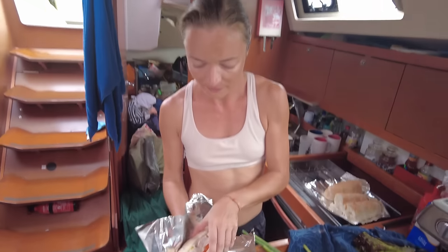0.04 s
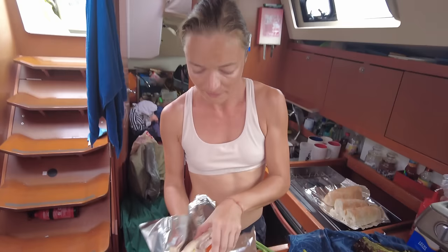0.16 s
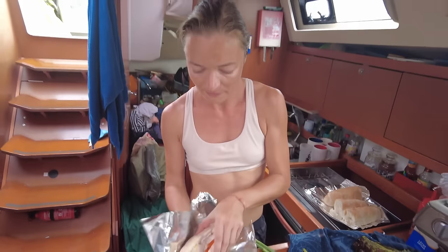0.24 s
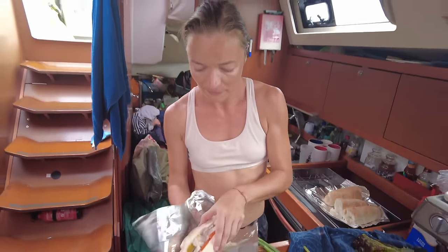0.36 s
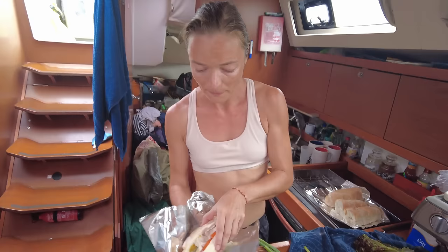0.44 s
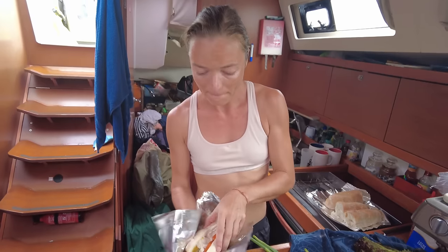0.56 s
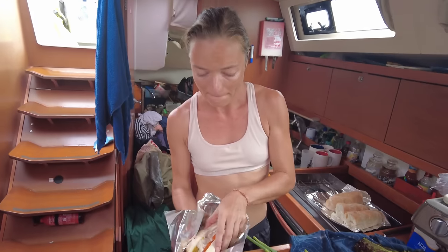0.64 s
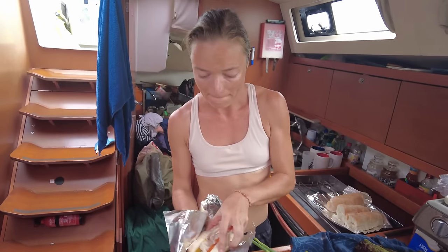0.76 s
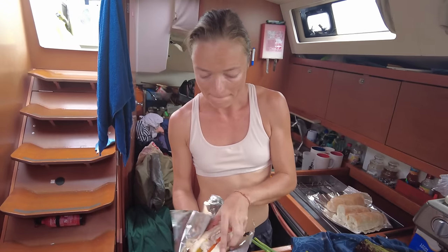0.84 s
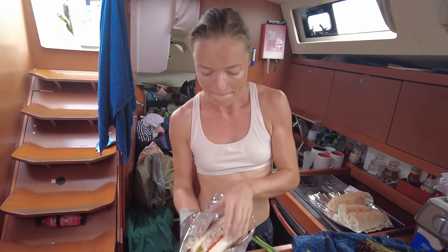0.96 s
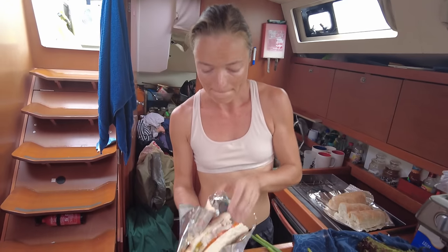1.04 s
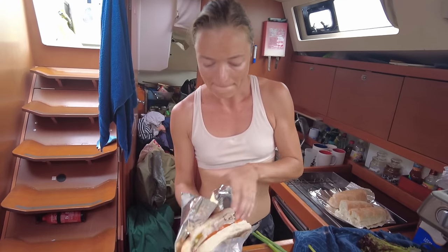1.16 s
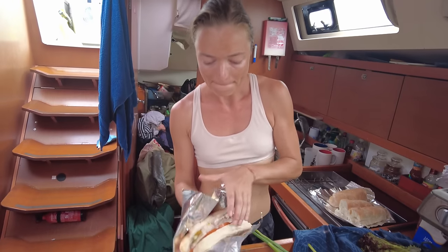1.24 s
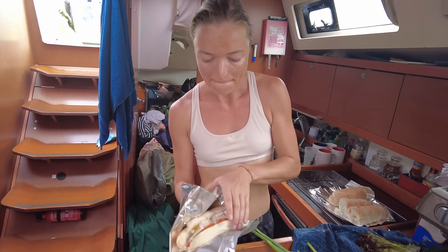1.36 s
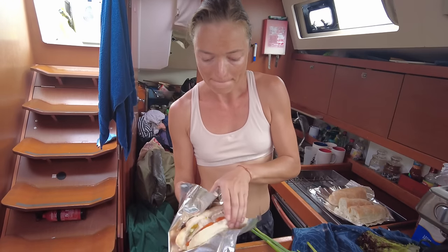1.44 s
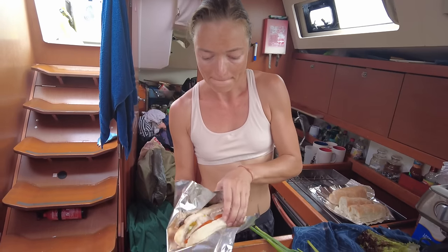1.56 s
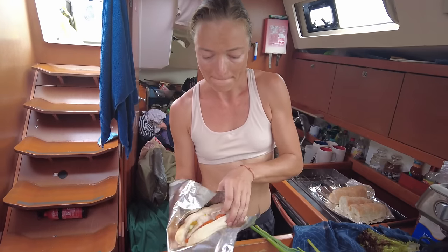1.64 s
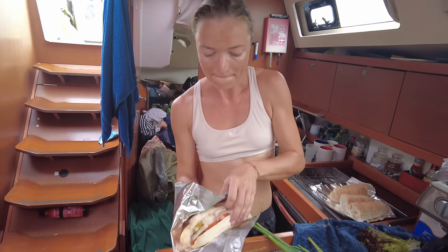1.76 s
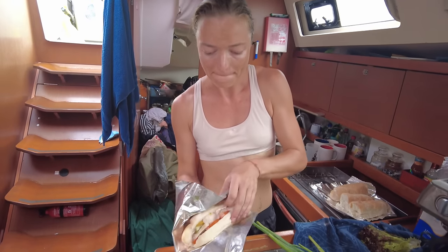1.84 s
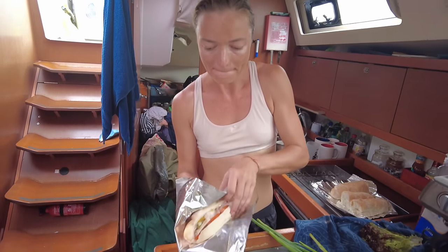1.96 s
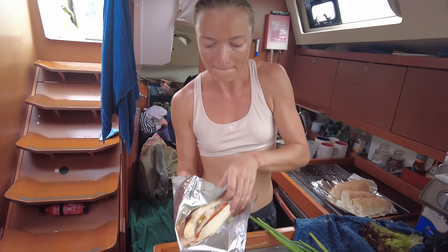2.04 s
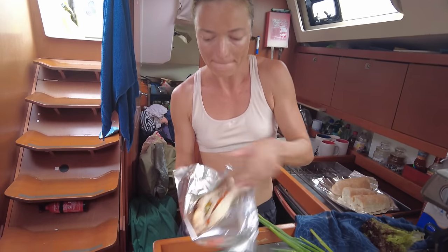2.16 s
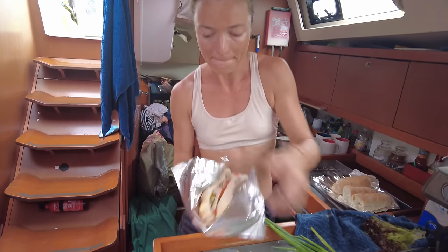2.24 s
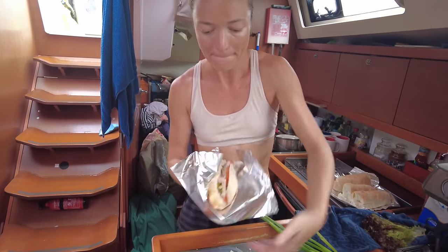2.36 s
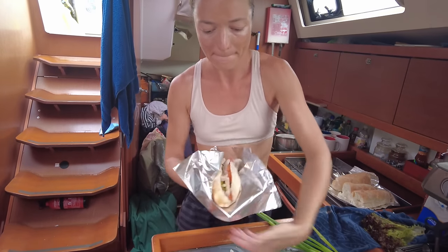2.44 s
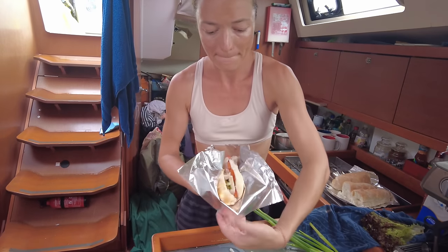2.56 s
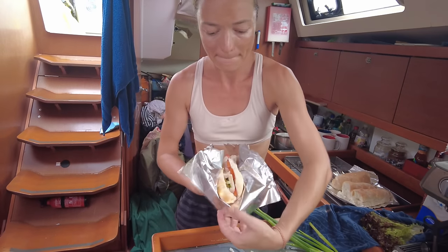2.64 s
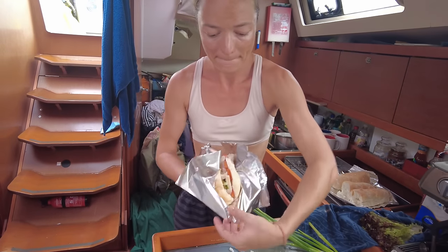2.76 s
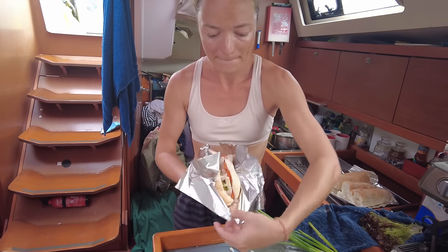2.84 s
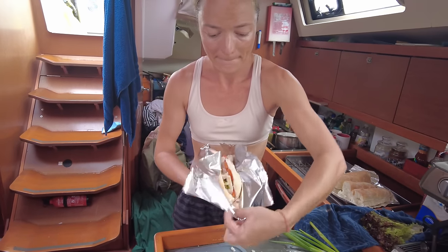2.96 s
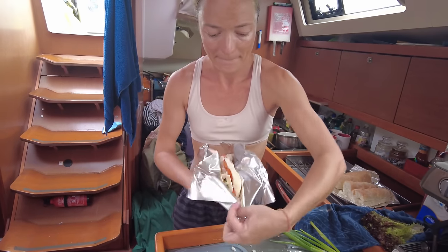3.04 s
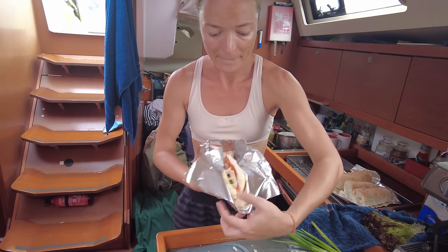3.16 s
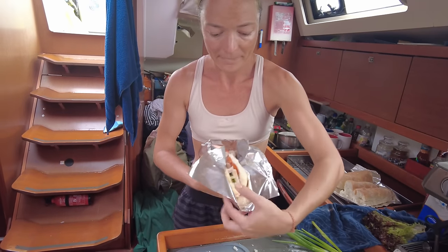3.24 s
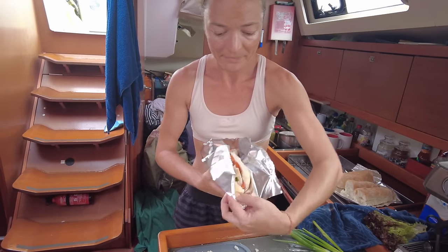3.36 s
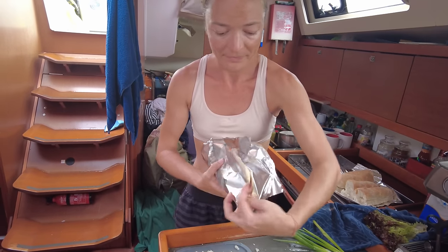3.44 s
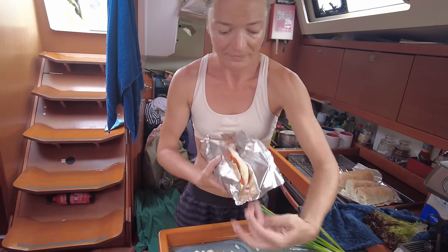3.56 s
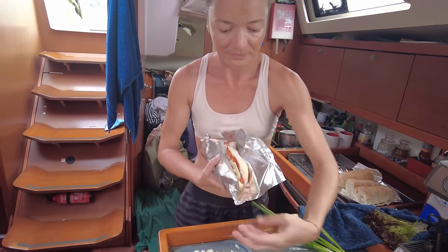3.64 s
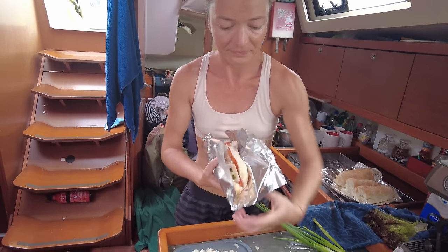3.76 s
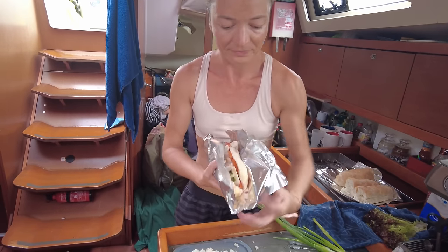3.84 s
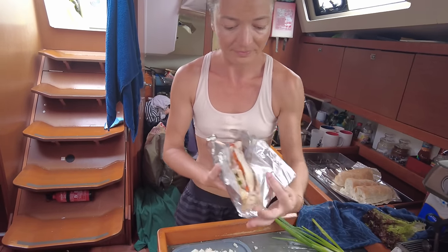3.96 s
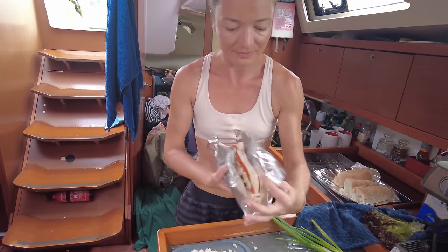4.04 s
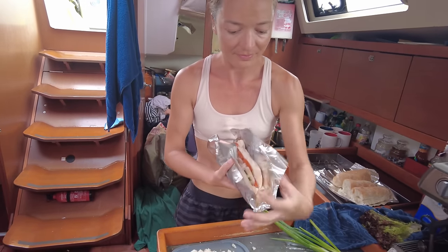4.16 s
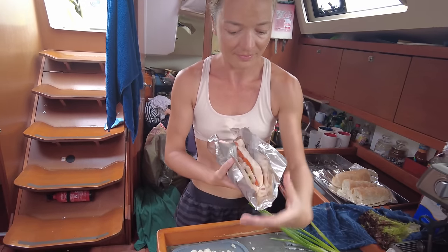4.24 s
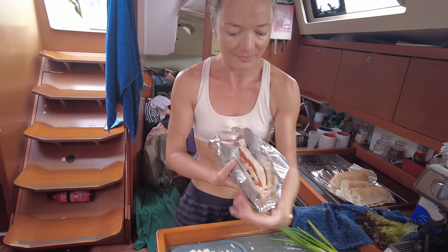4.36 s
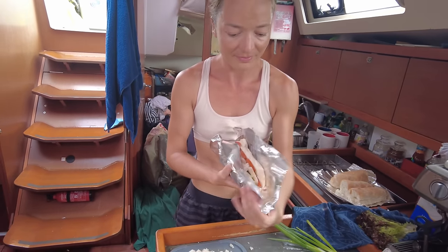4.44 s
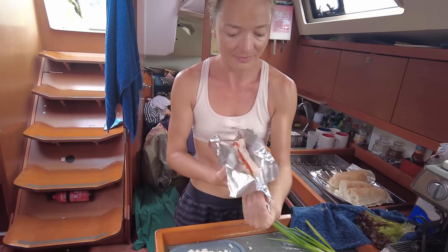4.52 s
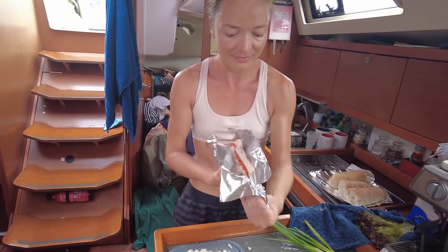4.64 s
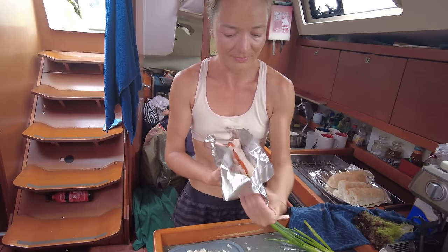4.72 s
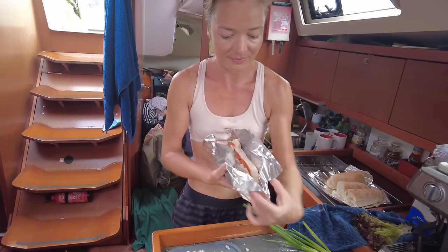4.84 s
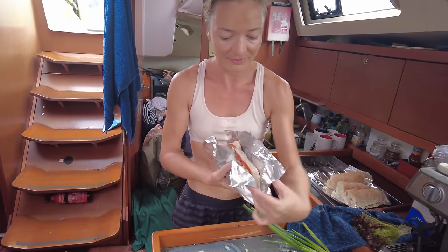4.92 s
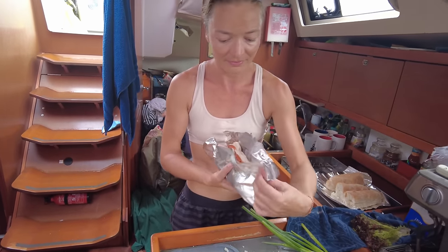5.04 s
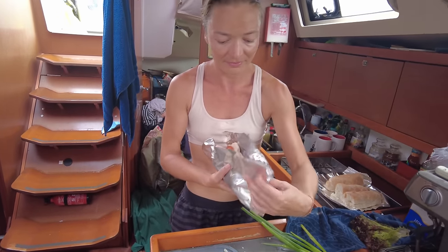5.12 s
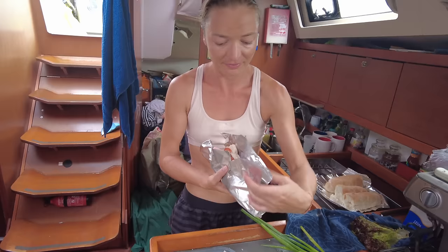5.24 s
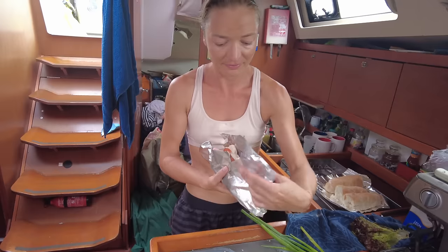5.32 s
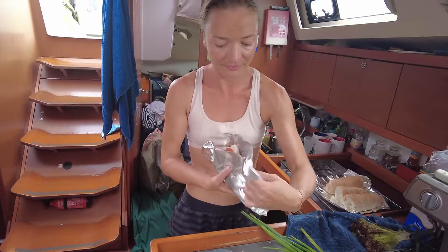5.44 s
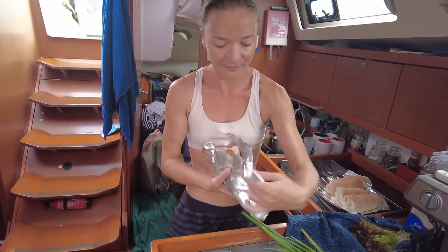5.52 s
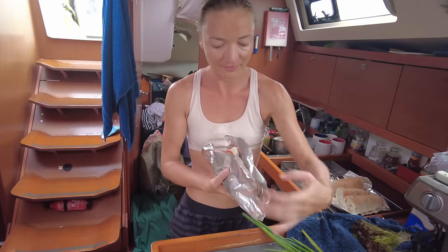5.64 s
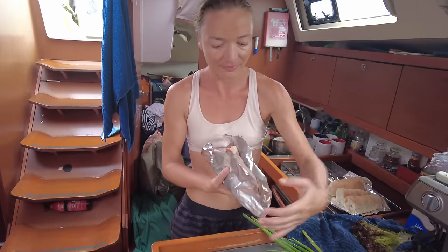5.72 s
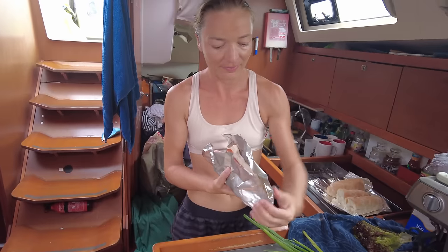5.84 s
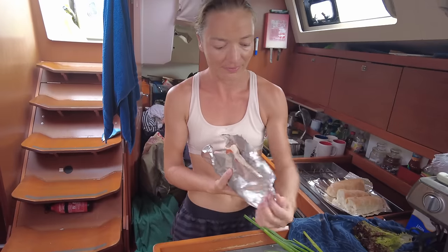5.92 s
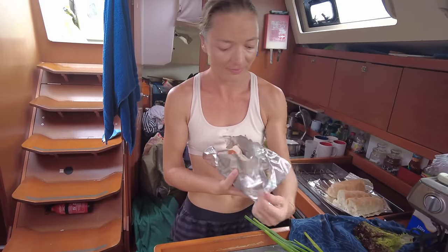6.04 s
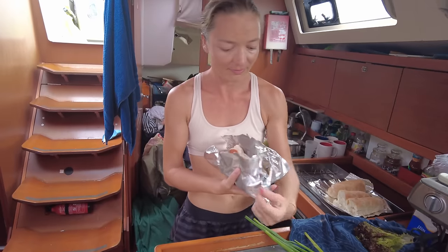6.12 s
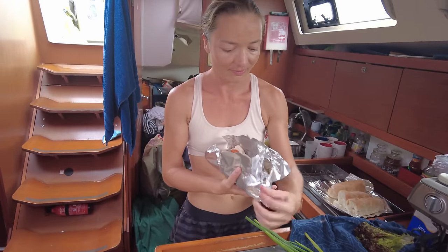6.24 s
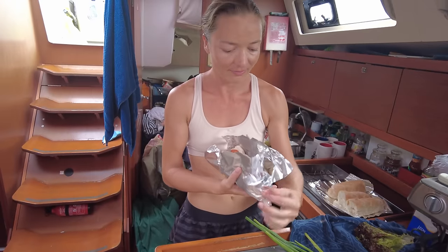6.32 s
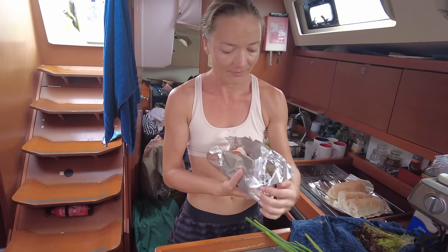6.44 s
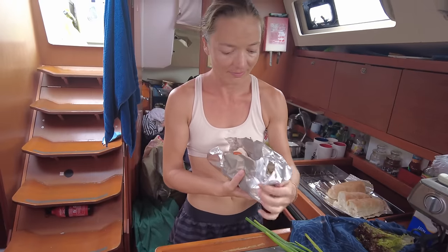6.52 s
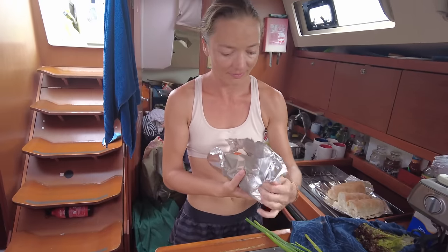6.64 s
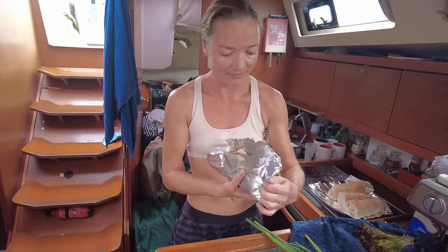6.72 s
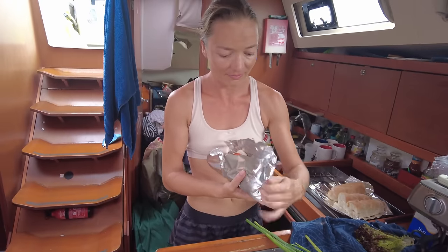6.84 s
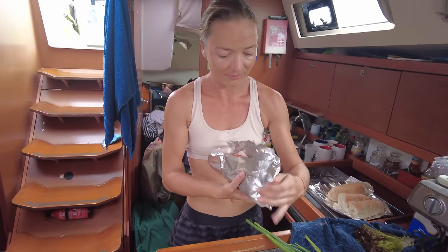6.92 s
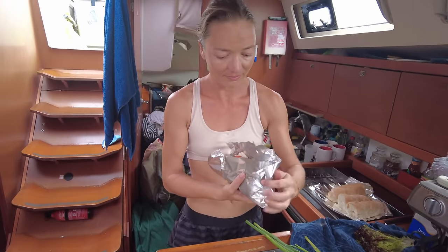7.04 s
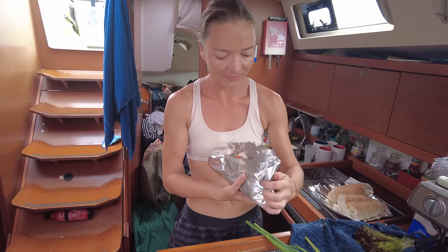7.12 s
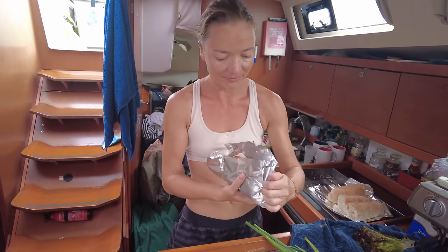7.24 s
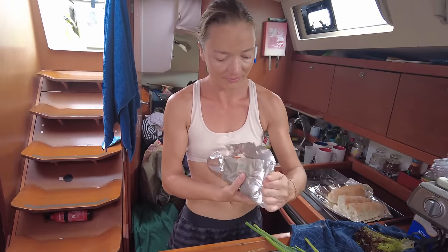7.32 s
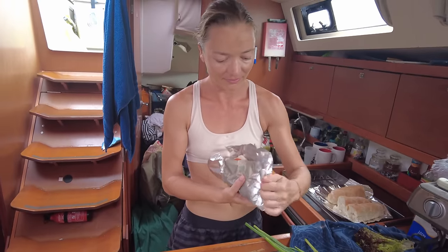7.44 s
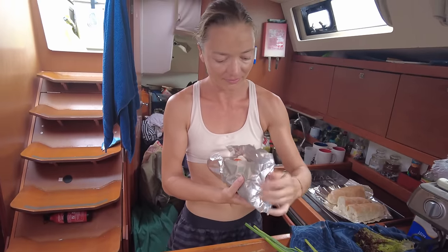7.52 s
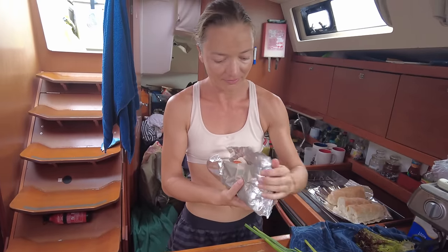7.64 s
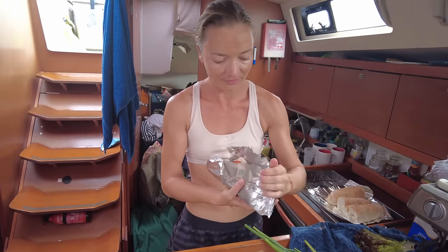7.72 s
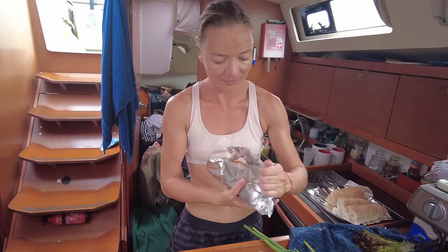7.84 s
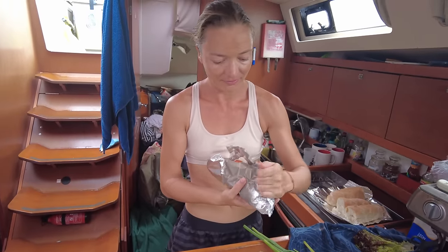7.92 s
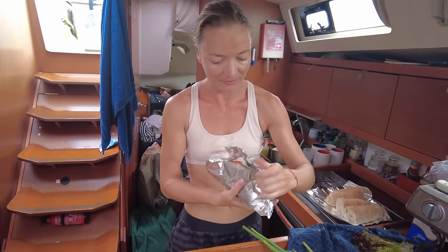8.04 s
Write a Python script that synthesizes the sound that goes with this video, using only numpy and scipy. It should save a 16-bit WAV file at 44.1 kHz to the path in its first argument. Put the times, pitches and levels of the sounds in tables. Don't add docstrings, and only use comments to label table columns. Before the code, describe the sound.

Crisp aluminium foil crackles and snaps close up as hands fold and press it around food, over a faint far engine drone.

```python
import sys
import numpy as np
from scipy import signal
from scipy.fft import rfft, irfft
from scipy.io import wavfile

SR = 44100
rng = np.random.default_rng(int(sys.argv[2]) if len(sys.argv) > 2 else 0)


def volts_from_decibels(level):
    exponent = np.asarray(level, float) / 20
    return 10 ** exponent


def to_wav(sig):
    pcm = np.clip(np.atleast_2d(sig), -1, 1) * 32767
    pcm = np.round(pcm).astype(np.int16)
    wavfile.write(sys.argv[1], SR, pcm.T)


N = 356416
EVENT_N = 4000

EDGES = 130 * 2 ** np.arange(0, 7.4, 1 / 3)


def rms_one(x):
    return x / np.sqrt(np.mean(x ** 2) + 1e-20)


def in_time(rows):
    s, *columns = np.transpose(rows)
    return [np.interp(np.arange(N) / SR, s, c) for c in columns]


def at_hz(points, hz):
    points_hz, values = np.array(points)[:, 0], np.array(points)[:, 1]
    return np.interp(np.log(hz), np.log(points_hz), values)


def drift(rate_hz):
    r = np.exp(-40 * np.pi * rate_hz / SR)
    white = rng.standard_normal(N // 20 + 2002)
    slow = signal.lfilter([1], [1, -2 * r, r * r], white)[2000:]
    return np.interp(np.arange(N) / 20, np.arange(len(slow)), rms_one(slow))


def band(x, low_hz, high_hz):
    sos = signal.butter(2, [low_hz, min(high_hz, .45 * SR)], "band", fs=SR, output="sos")
    return signal.sosfilt(sos, x)


def resonance(x, hz, width_hz):
    r = np.exp(-np.pi * width_hz / SR)
    zeros = np.array([1, 0, -1]) * (1 - r * r) / 2
    return signal.lfilter(zeros, [1, -2 * r * np.cos(2 * np.pi * hz / SR), r * r], x)


def add_event(out, start, sound):
    out[start:start + EVENT_N] += sound


def buckles(per_s, spread_db, clump_db):
    sizes = volts_from_decibels(spread_db * np.minimum(rng.exponential(1, N), 5)) * rng.choice([-1, 1], N)
    chance = per_s * volts_from_decibels(clump_db * drift(25.0)) / SR
    return sizes * (rng.random(N) < chance)


def pressure():
    # start_s, rise_s, fall_s, peak_db, boom_db (broad sheet)
    grips = [(0.0, 0.0035, 0.06, -35, -5.5), (0.10, 0.12, 0.083, -31.5, -10),
             (0.308, 0.021, 0.17, -34, -11.5), (0.4, 0.042, 0.095, -26.5, -12.5),
             (0.52, 0.018, .04, -29, -10), (0.545, 0.046, 0.26, -29, -8.5), (0.76, 0.022, .04, -39, -8),
             (0.85, 0.087, .06, -29.5, -10.5), (1.02, 0.031, 0.12, -31, -8.5),
             (1.31, 0.019, 0.19, -36.5, -12.5), (1.45, .15, 0.057, -32.5, -10.5),
             (1.66, .1, 0.055, -35, -7.5), (1.85, 0.037, 0.064, -35, -9.5), (1.92, 0.14, 0.1, -32, -7.5),
             (2.232, 0.044, .01, -35.5, -6.5), (2.27, .016, 0.033, -28.5, -6.5),
             (2.35, 0.017, 0.095, -45, -10), (2.53, 0.057, .03, -50, -18), (2.66, 0.11, 0.076, -29.5, -10),
             (2.83, .21, .12, -28, -10), (3.192, 0.0056, 0.18, -33, -10.5),
             (3.368, 0.015, 0.056, -27.5, -14), (3.41, 0.093, 0.12, -29, -7),
             (3.55, 0.044, 0.082, -31, -10)]
    # start_s, rise_s, fall_s, peak_db, boom_db
    folds = [(3.918, 0.021, .01, -42, -9), (3.944, 0.033, 0.2, -27.5, -10), (4.02, 0.092, 0.059, -32, -3.5),
             (4.245, 0.011, 0.032, -38, -17), (4.482, 0.014, .06, -29, -9),
             (4.51, 0.075, 0.048, -24.5, -8.5), (4.66, 0.055, 0.03, -30, -7),
             (4.77, 0.009, .2, -36.5, -11.5), (4.9, 0.15, 0.037, -35.5, -10.5),
             (5.04, 0.037, 0.11, -26, -7.5), (5.08, 0.04, .07, -29, -9.5), (5.13, 0.042, 0.16, -28, -11.5),
             (5.34, 0.086, 0.1, -25.5, -8), (5.56, 0.096, 0.015, -29, -10.5)]
    # start_s, rise_s, fall_s, peak_db, boom_db
    tucks = [(5.876, 0.034, 0.099, -35.5, -11.5), (5.945, 0.026, 0.086, -31, -7.5),
             (5.99, 0.1, 0.1, -28, -8.5), (6.17, 0.041, .13, -35.5, -9), (6.384, 0.0043, 0.012, -52, -13),
             (6.47, 0.031, .04, -35, -10.5), (6.55, 0.08, 0.12, -32, -9.5), (6.66, 0.074, 0.093, -31.5, -9),
             (6.87, 0.16, 0.04, -33.5, -8), (7.151, 0.0069, .02, -33.5, -10), (7.19, 0.11, 0.075, -30, -7),
             (7.32, 0.091, 0.02, -30, -8.5), (7.475, 0.07, 0.035, -33, -7.5), (7.7, 0.086, 0.34, -34, -7.5),
             (7.82, 0.13, .05, -33, -11), (8.05, 0.033, .02, -36, -7)]
    # time_s, crisp_db
    crisp = [
        (0, -4),
        (0.5, 1),
        (2.5, -0.5),
        (4.2, 4),
        (5.2, -0.5),
        (6.1, -0.5),
        (6.4, 0.5),
        (7.3, -3.5),
        (8.08, -2),
    ]
    settle_db, settle_boom_db = -72.5, 2
    bite_db, sink_db, release_db_per_s = 8.5, 9, 246
    boom_per_db, sharp_db, sharp_per_db = 0.19, -3, 0.25
    firm_db = -28

    t = np.arange(N) / SR
    power = np.full(N, volts_from_decibels(2 * settle_db))
    boom = power * settle_boom_db
    for s, rise_s, fall_s, peak_db, boom_db in list(grips) + list(folds) + list(tucks):
        rise_s, fall_s = max(rise_s, .002), max(fall_s, .002)
        span = slice(round(s * SR), round((s + 1) * SR))
        knots_s = [0, rise_s, rise_s + fall_s, rise_s + fall_s + 1]
        drop_db = np.interp(t[span] - s, knots_s, [bite_db, 0, sink_db, sink_db + release_db_per_s])
        share = volts_from_decibels(2 * (peak_db - drop_db))
        power[span] += share
        boom[span] += share * (boom_db + boom_per_db * drop_db)
    level_db = 10 * np.log10(power)
    sharpness_db = in_time(crisp)[0] + sharp_db + sharp_per_db * np.minimum(level_db - firm_db, 0)
    return level_db, boom / power, sharpness_db


def crackle(level_db, boom_db, sharp_db):
    # freq_hz, density_db (per Hz)
    foil_colour = [(76, -43), (130, -20.5), (334, -7), (775, -8.5), (1010, -8), (2070, 3), (2800, 4.5),
                   (3860, 4), (7180, 6), (11000, -2.5), (15700, -7.5)]
    wide = rms_one(buckles(1200, spread_db=3.0, clump_db=3.5))
    small = [rms_one(buckles(3000, spread_db=4.0, clump_db=7.0)) for _ in range(3)]
    out = np.zeros(N)
    for k, (lo, hi) in enumerate(zip(EDGES, EDGES[1:])):
        hz = np.sqrt(lo * hi)
        low_share = np.clip(np.log2(2000 / hz), 0, 1)
        top_share = np.clip(np.log2(hz / 6000), 0, 1)
        colour_db = at_hz(foil_colour, hz) + low_share * (boom_db + 16.5) + top_share * (sharp_db + 8.0)
        out += volts_from_decibels(colour_db + 1.43 * drift(34.5)) * band(1.52 * wide + small[k % 3], lo, hi)
    return volts_from_decibels(level_db - 3.5) * rms_one(out)


def facets(level_db):
    pops = rms_one(buckles(400, spread_db=4.0, clump_db=3.5))
    dealt = rng.integers(0, 40, N)
    rings = np.zeros(N)
    for k, hz in enumerate(np.geomspace(1100, 7500, num=40)):
        rings += resonance(pops * (dealt == k) + 1e-18, hz, .015 * hz + 15)
    return volts_from_decibels(level_db - 14.0) * rms_one(rings)


def engine():
    # time_s, firing_hz, level_db
    firing = [
        (0, 52, -55.5),
        (1.3, 50, -59),
        (2.3, 47.02, -50),
        (3.2, 43.47, -61),
        (4.5, 42.34, -59.5),
        (6.5, 41, -67),
        (8.08, 41.2, -63),
    ]
    hz, level_db = in_time(firing)
    phase = 2 * np.pi * np.cumsum(hz * (1 + .06 * drift(8.0))) / SR
    octave = resonance(rng.standard_normal(N), 90.6, 19)
    return volts_from_decibels(level_db + 2.3 * drift(6.5)) * np.sin(phase) + volts_from_decibels(-63.0) * rms_one(octave)


def air():
    # freq_hz, density_db (per Hz)
    air_colour = [(12, -22), (20, 9.5), (45, -2.5), (75, -11), (334, -19), (965, -18.5), (3200, -28.5),
                  (15700, -56)]
    hz = np.maximum(np.arange(N // 2 + 1) * SR / N, 5)
    spectrum = rfft(rng.standard_normal(N)) * volts_from_decibels(at_hz(air_colour, hz))
    return volts_from_decibels(-55.5) * rms_one(irfft(spectrum, N))


def snaps():
    # time_s, peak_db, centre_hz
    turn_snaps = [(0.0385, -17.5, 6800), (0.1063, -22, 2800), (0.182, -16, 7610), (0.2033, -16, 7200),
                  (0.2588, -17, 9550), (0.3092, -13, 6250), (0.4292, -13, 6350), (0.7811, -23, 7160),
                  (0.861, -12.5, 5700), (0.9343, -13, 3040), (1.0315, -13.5, 6500), (1.0924, -14, 5030),
                  (1.3367, -14.5, 7600), (1.4624, -17, 6500), (1.5898, -18, 2210), (1.718, -18, 6900),
                  (1.8505, -25, 9000), (2.0418, -12, 4540), (2.2343, -22, 7600), (2.2785, -12, 6440),
                  (2.5704, -18, 9650), (2.6604, -28, 4740), (2.7055, -13, 6800), (2.7601, -8, 7040),
                  (2.8883, -16.5, 7100), (3.026, -9.5, 5500), (3.1996, -14.5, 5100), (3.2326, -14.5, 7460),
                  (3.3722, -10, 7100), (3.4511, -10, 6960)]
    # time_s, peak_db, centre_hz
    fold_snaps = [(3.493, -12, 7210), (3.9603, -11.5, 5700), (4.0643, -7, 5600), (4.1124, -10, 7200),
                  (4.2482, -15, 5440), (4.4864, -20, 5040), (4.6808, -18.5, 6160), (4.7744, -13.5, 6550),
                  (4.931, -19, 5600), (5.0681, -12.5, 7440), (5.363, -20, 5500), (5.4306, -20, 4250),
                  (5.599, -12.5, 4770), (5.882, -22, 5000), (5.9554, -16, 4800), (6.0016, -11, 5500),
                  (6.0818, -10, 5200), (6.3848, -21.5, 4570), (6.4702, -18.5, 6600), (6.6075, -14, 8680),
                  (6.7185, -12, 4800), (6.7974, -21, 4400), (7.004, -10.5, 2740), (7.152, -23.5, 1900),
                  (7.2414, -19.5, 7500), (7.379, -15, 3000), (7.589, -16.5, 5100), (7.6805, -23, 6500),
                  (7.7125, -23, 3790), (7.7462, -15.5, 5400)]
    # time_s, peak_db, centre_hz
    ticks = [(1.29, -34, 3360), (1.3043, -28, 7040), (2.534, -32, 2510), (2.5574, -30, 3080),
             (3.85, -39, 4900), (3.926, -54, 4580), (4.4593, -34.5, 3520), (6.451, -32, 7310),
             (6.6754, -24, 2870), (6.926, -20.5, 9260), (7.5348, -25, 6000), (7.8102, -16, 1950),
             (7.9226, -33, 5040), (8.0074, -17.5, 5200)]
    snap_t60_s, tick_t60_s = 0.062, 0.03
    push_db, push_spread_db = -26, 2

    rows = [(*row, snap_t60_s) for row in list(turn_snaps) + list(fold_snaps)]
    rows += [(*row, tick_t60_s) for row in ticks]
    out, t = np.zeros(N + EVENT_N), np.arange(EVENT_N) / SR
    for s, peak_db, hz, t60_s in rows:
        rattle = rng.standard_normal(EVENT_N) * rng.exponential(1, EVENT_N)
        low_db = push_db + push_spread_db * rng.standard_normal()
        burst = rattle * volts_from_decibels(-60 * t / t60_s)
        burst[0] += 3.0
        bright = band(burst, hz / 1.53, hz * 1.61) + .5 * band(burst, 1930, 16100)
        low = band(burst, 255, 910)
        start = round(s * SR)
        add_event(out, start, volts_from_decibels(peak_db - 7.5) * bright / np.abs(bright).max())
        add_event(out, start, volts_from_decibels(peak_db + low_db - 3.0) * low / np.abs(low).max())
    return out[:N]


def cracks():
    # time_s, peak_db
    creases = [(0.1861, -27), (1.851, -19), (2.0437, -26), (2.093, -13), (3.0498, -14), (3.4519, -5),
               (4.5857, -25), (4.7173, -18), (4.864, -10.5), (5.0744, -17), (5.133, -7), (5.6011, -28),
               (5.6445, -9), (5.9706, -9), (6.085, -18), (6.4707, -27), (6.7987, -29), (7.5363, -24)]
    out, t = np.zeros(N + EVENT_N), np.arange(EVENT_N) / SR
    click = band(t == 0, 1700, 11300)
    for s, peak_db in creases:
        add_event(out, round(s * SR) - 2, -volts_from_decibels(peak_db - 3) * click / click.max())
    return out[:N]


def pings():
    # time_s, peak_db, pitch_hz
    ringing = [(0.203, -45, 495), (0.31, -41, 966), (0.432, -35.5, 524), (0.692, -30, 2870),
               (0.936, -25.5, 2780), (2.285, -34, 1345), (2.711, -41.5, 536), (2.92, -45, 505),
               (3.05, -32, 406), (3.066, -36, 1140), (3.132, -47, 503), (3.329, -39.5, 526),
               (3.393, -37.5, 513), (3.474, -39, 520), (4.062, -36.0, 1130), (4.066, -29, 2140),
               (4.15, -42.5, 530), (4.573, -37, 427), (5.112, -26, 2480), (5.163, -31, 1370),
               (5.17, -34, 404), (5.217, -42, 379), (5.439, -22.5, 4280), (6.078, -36.5, 1026),
               (6.118, -40, 380), (6.609, -37.5, 1030)]
    out, t = np.zeros(N + EVENT_N), np.arange(EVENT_N) / SR
    for s, peak_db, hz in ringing:
        shape = (1 - np.exp(-t / 0.0014)) * volts_from_decibels(-60 * t / (0.045 + 30 / hz))
        add_event(out, round(s * SR), volts_from_decibels(peak_db) * shape * np.sin(2 * np.pi * hz * t))
    return out[:N]


def thuds():
    # time_s, peak_db, pitch_hz
    palms = [
        (4.06, -30, 330),
        (4.113, -33, 297),
        (5.165, -31, 172),
        (5.365, -33, 190),
        (5.433, -32, 200),
        (5.638, -29, 271),
        (6.472, -37, 406),
        (6.858, -39, 420),
        (7.31, -34, 230),
    ]
    out, t = np.zeros(N + EVENT_N), np.arange(EVENT_N) / SR
    for s, peak_db, hz in palms:
        add_event(out, round(s * SR), volts_from_decibels(peak_db) * volts_from_decibels(-60 * t / 0.018) * np.sin(2 * np.pi * hz * t))
    return out[:N]


def afterglow(x, t60s, lag):
    out, white = np.zeros(N), rng.standard_normal((2, N))
    for k, (lo, hi) in enumerate(zip(EDGES[::2], EDGES[2::2])):
        keep = volts_from_decibels(-120 / at_hz(t60s, np.sqrt(lo * hi)) / SR)
        energy = signal.lfilter([1 - keep], [1, -keep], band(x, lo, hi) ** 2)
        glow = np.sqrt(energy) * rms_one(band(white[k % 2], lo, hi))
        out[lag:] += glow[:N - lag]
    return out


def scene():
    # freq_hz, t60_s
    sheet_ring = [(200, 0.031), (1000, 0.012), (5000, 0.063), (15000, 0.0033)]
    # freq_hz, t60_s
    cabin_tail = [(150, 0.091), (1000, 0.13), (5000, 0.18), (9000, 0.073), (14000, 0.1)]
    # freq_hz, width_hz, level_db
    cabin_modes = [(378.6, 8.3, -1), (509, 20, -5), (676, 22, -6), (852, 18, -1), (1004.4, 26, 2),
                   (1210, 17, -4), (1282, 20, -20)]
    echo_s, echo_share = 0.000518, -0.12

    level_db, boom_db, sharp_db = pressure()
    foil = crackle(level_db, boom_db, sharp_db) + facets(level_db)
    foil = foil + snaps() + cracks() + pings() + thuds()
    foil = foil + volts_from_decibels(-1.5) * afterglow(foil, sheet_ring, lag=20)
    foil = foil + volts_from_decibels(-7.5) * afterglow(foil, cabin_tail, lag=260)
    foil = foil + sum(volts_from_decibels(db) * resonance(foil, hz, width_hz) for hz, width_hz, db in cabin_modes)
    foil = foil + echo_share * np.interp(np.arange(N) - echo_s * SR, np.arange(N), foil)
    return (foil + engine() + air())[None]


def top_cut(x):
    return signal.sosfilt(signal.butter(12, 16990, fs=SR, output="sos"), x)


def record(dry):
    steep = signal.ellip(14, .5, 70, 15745, fs=SR, output="sos")
    mix = signal.sosfilt(steep, dry)
    return top_cut(mix)


dry = scene()
out = record(dry)
to_wav(out)
```